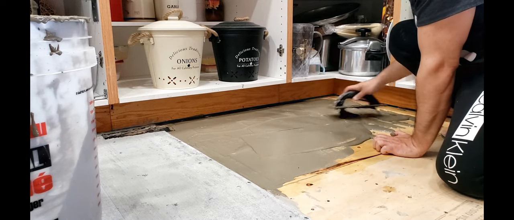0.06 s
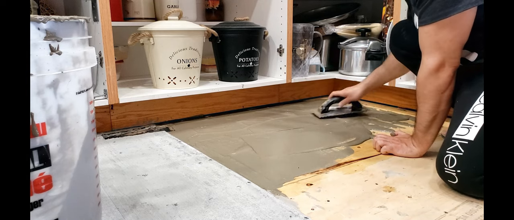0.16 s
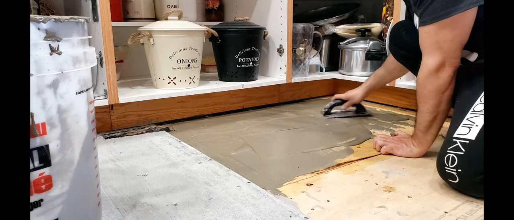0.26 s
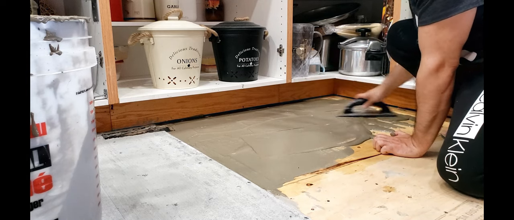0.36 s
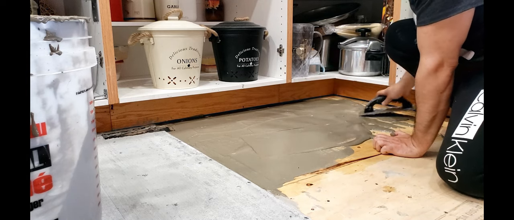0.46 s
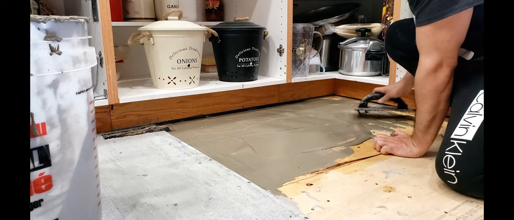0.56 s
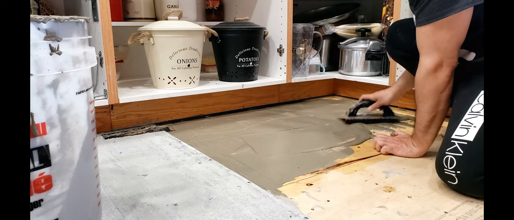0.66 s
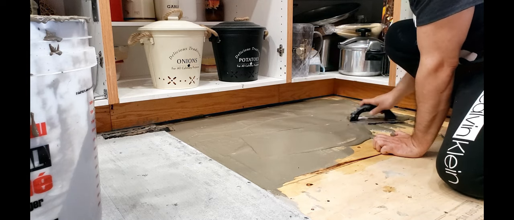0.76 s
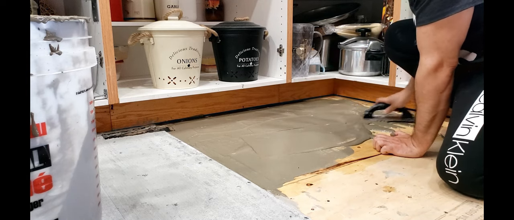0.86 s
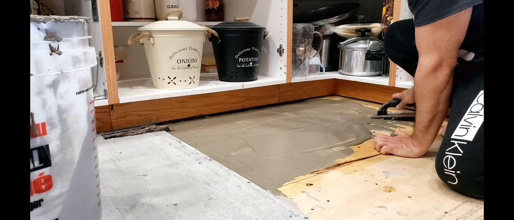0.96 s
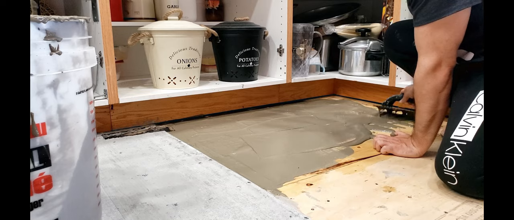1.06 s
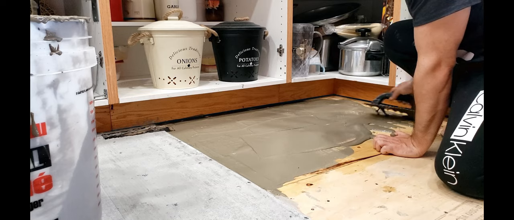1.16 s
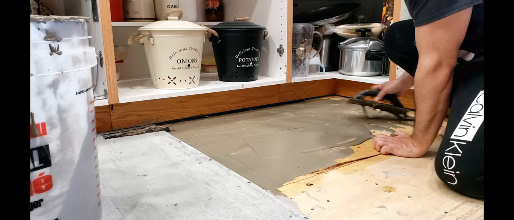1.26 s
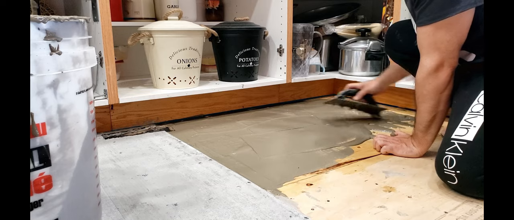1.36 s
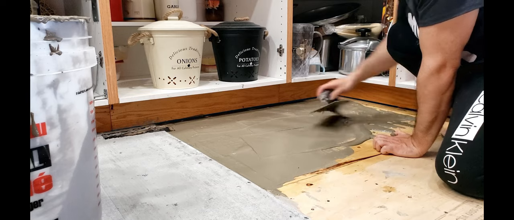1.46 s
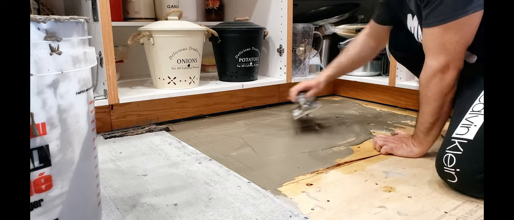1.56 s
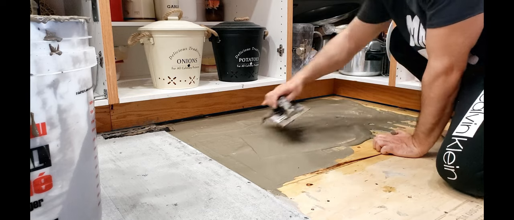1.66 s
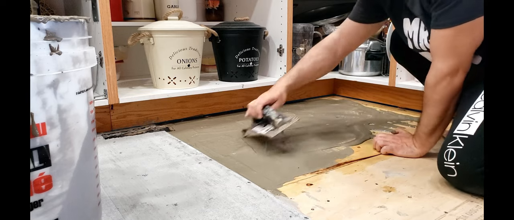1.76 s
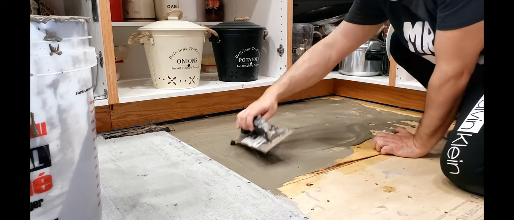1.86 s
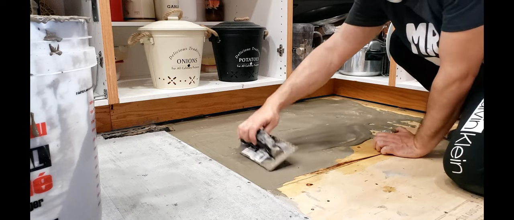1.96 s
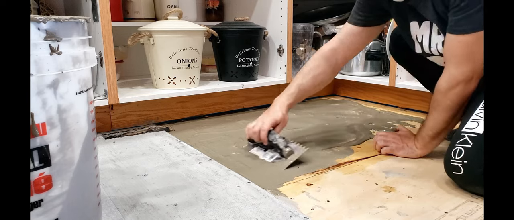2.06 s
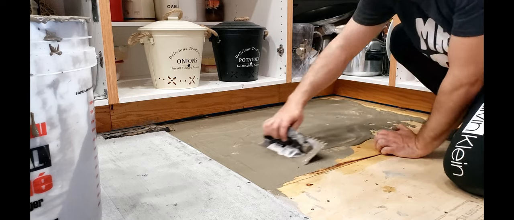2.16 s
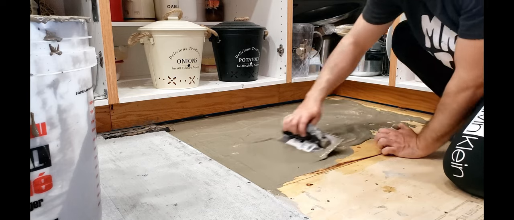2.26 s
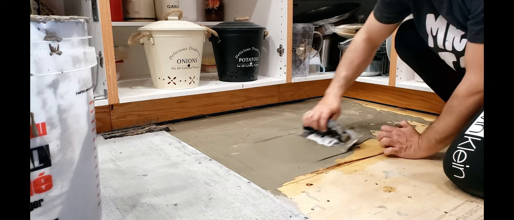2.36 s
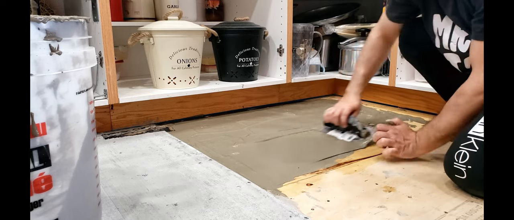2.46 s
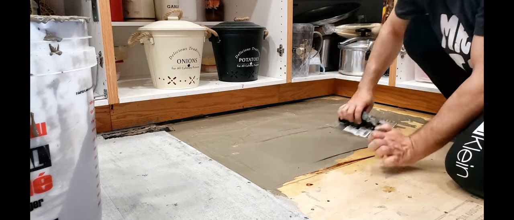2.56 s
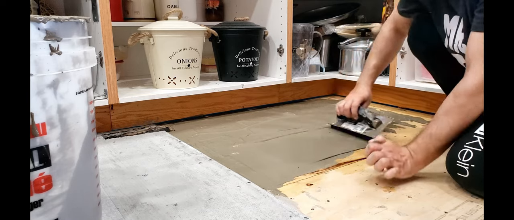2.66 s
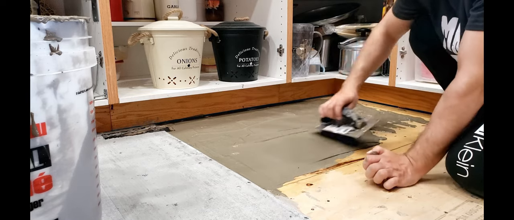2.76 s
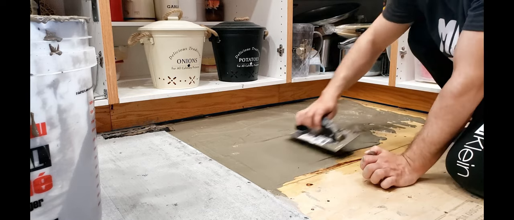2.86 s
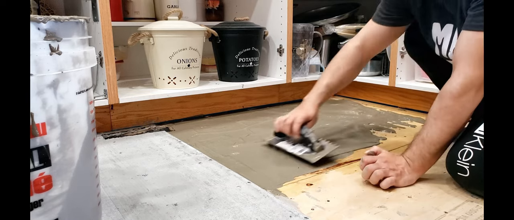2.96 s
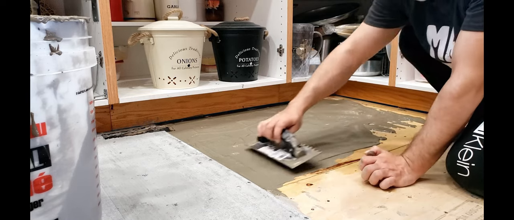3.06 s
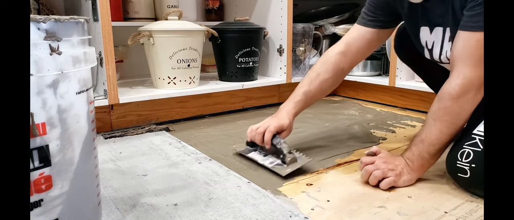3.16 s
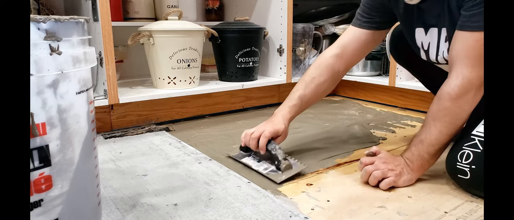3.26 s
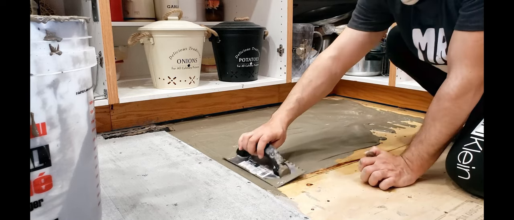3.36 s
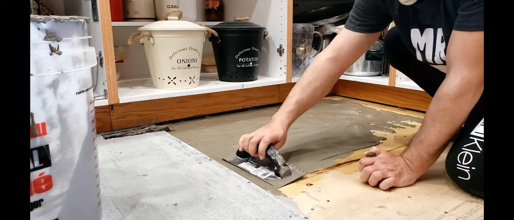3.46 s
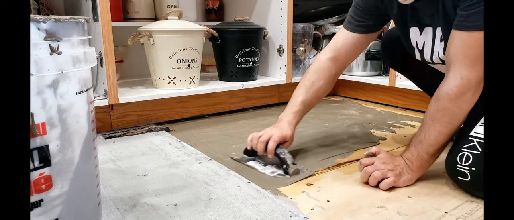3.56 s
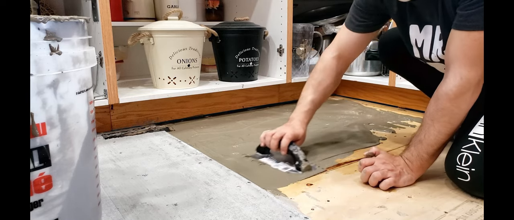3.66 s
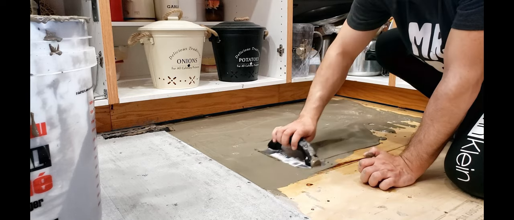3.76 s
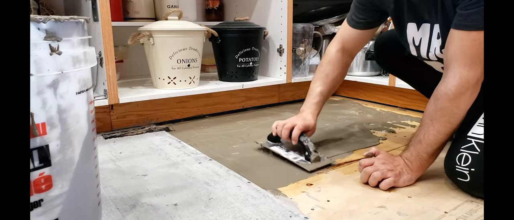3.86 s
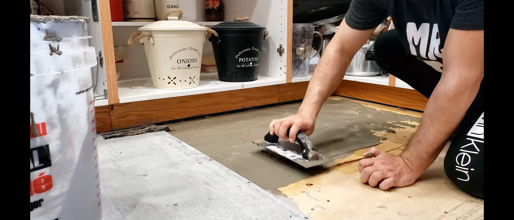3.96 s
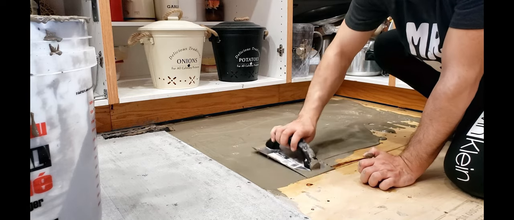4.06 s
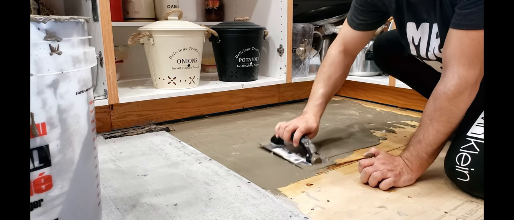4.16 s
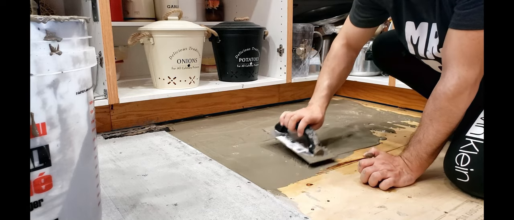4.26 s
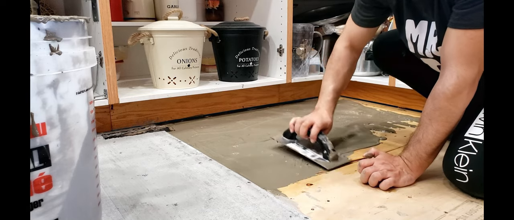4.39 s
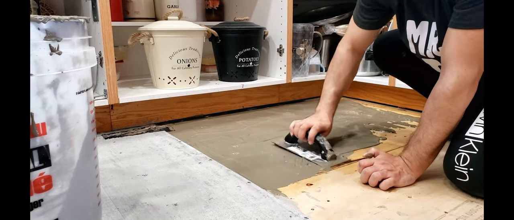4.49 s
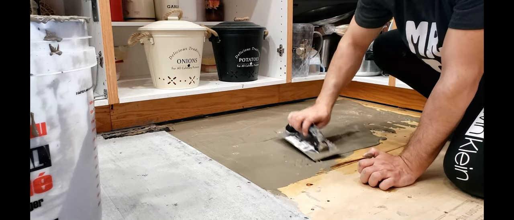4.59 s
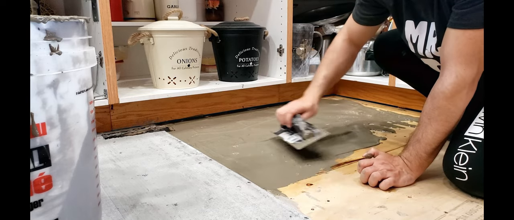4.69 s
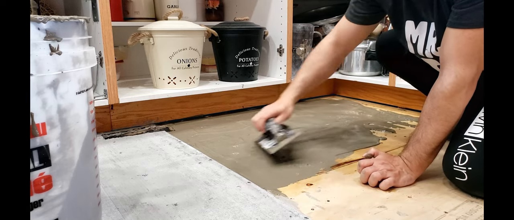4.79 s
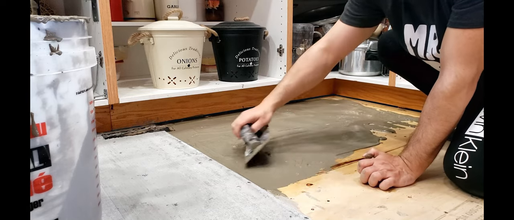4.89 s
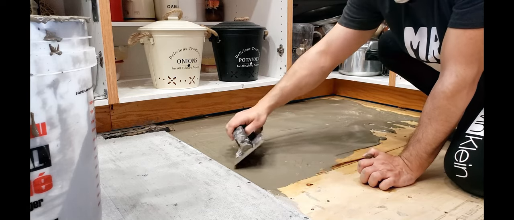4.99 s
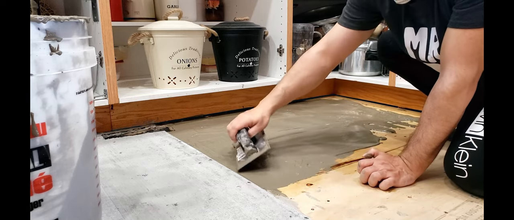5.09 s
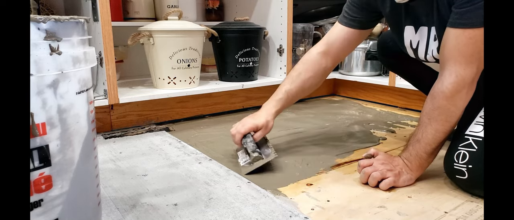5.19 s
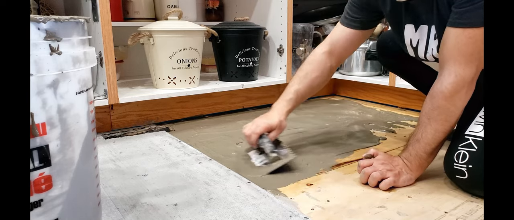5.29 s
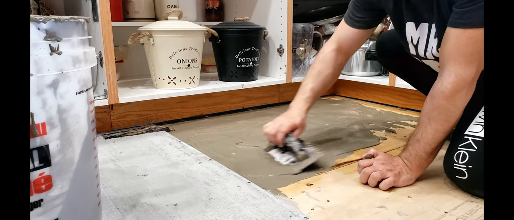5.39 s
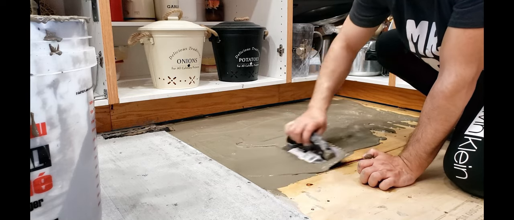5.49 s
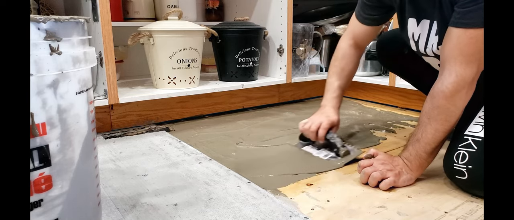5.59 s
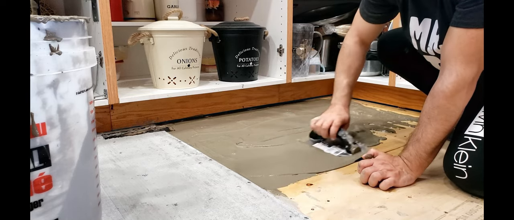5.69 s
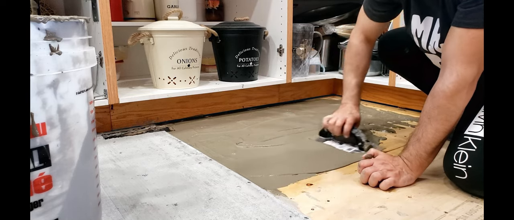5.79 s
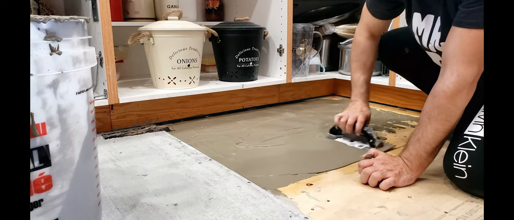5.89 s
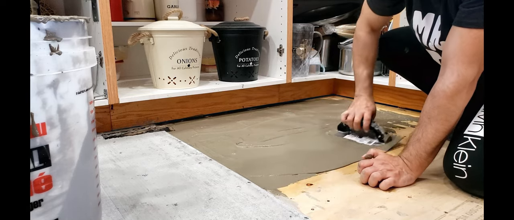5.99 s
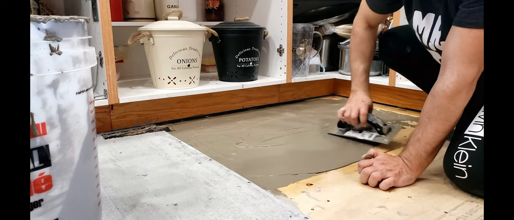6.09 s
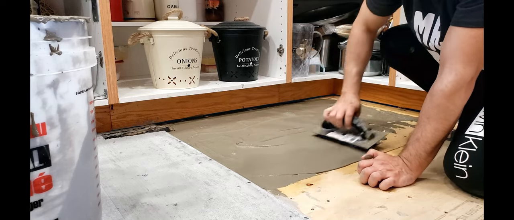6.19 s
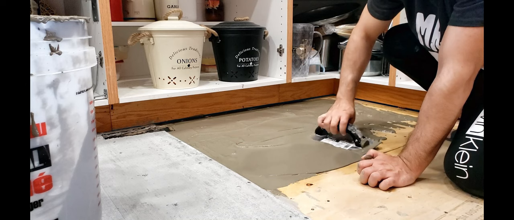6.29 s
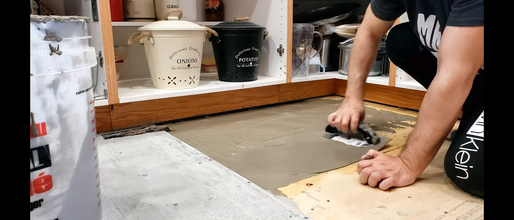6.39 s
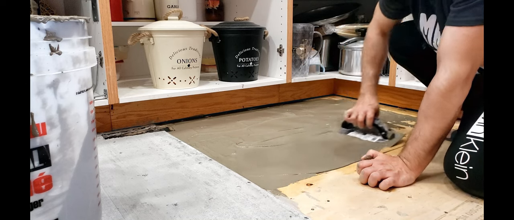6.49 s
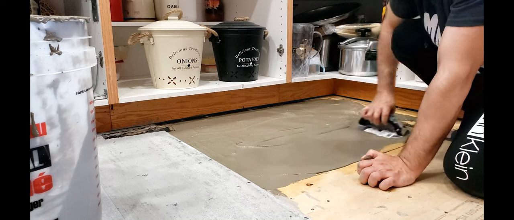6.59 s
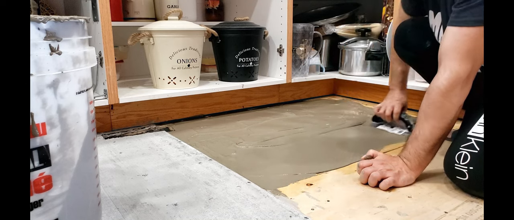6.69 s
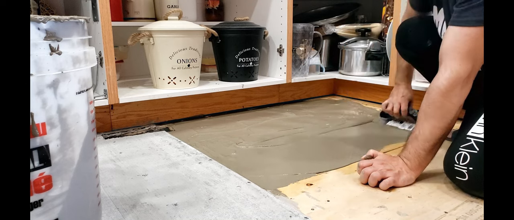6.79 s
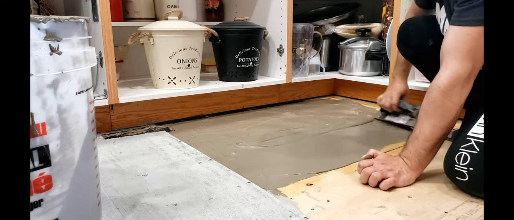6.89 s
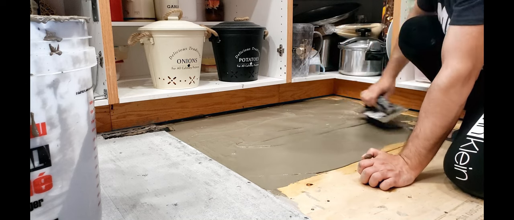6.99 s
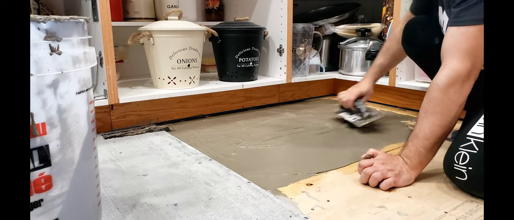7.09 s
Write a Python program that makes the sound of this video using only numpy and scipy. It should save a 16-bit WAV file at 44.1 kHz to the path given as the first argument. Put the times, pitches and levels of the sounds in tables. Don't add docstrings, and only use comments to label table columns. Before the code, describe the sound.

A steel trowel lands on a wooden floor and scrapes gritty mortar in short, hissing strokes, with knocks and ticks over a quiet fridge hum.

```python
import sys
import numpy as np
from scipy import signal
from scipy.fft import rfft, irfft, next_fast_len
from scipy.io import wavfile
from scipy.ndimage import uniform_filter1d

SR = 44100
rng = np.random.default_rng(int(sys.argv[2]) if len(sys.argv) > 2 else 0)


def volts_from_decibels(level):
    exponent = np.asarray(level, float) / 20
    return 10 ** exponent


def digitize_waveform(pressure):
    field = np.atleast_2d(pressure).T
    bounded = np.clip(field, -1, 1)
    quanta = np.round(bounded * 32767).astype(np.int16)
    wavfile.write(sys.argv[1], SR, quanta)


N = 315046

# start in seconds, steel tick level in dB,
# then thud, board knock and grit crack, each in dB relative to the tick.
LANDINGS = [(0.3752, -48.5, 2, 0, 1.5), (0.4188, -50, -19, -4, -24), (0.5241, -52, -20, 12, 13),
            (0.9105, -39, 2, 9.5, -8), (1.072, -51, -17, 7.5, -9), (2.1216, -49, 5.5, 3, 0),
            (2.1582, -35, 7, -1.5, -5), (2.3325, -36, -16, -13, -5.5), (3.2498, -66, 24.5, -8, -22),
            (3.2805, -66.5, 23, -7, -27), (3.543, -46.5, -14, -6, 1), (4.2254, -31.5, 6.5, -12, -2),
            (4.6, -30, 4, -8.5, -9.5), (5.001, -43.5, 10, 0.5, -10.5), (5.024, -42, 5.5, -3.5, -13),
            (5.133, -51.5, 23.5, 0, -12), (5.142, -36, -3, 1.5, -18), (5.325, -45.5, 5.5, -5, -2),
            (6.4367, -43, 7, 2, -11), (6.4503, -31.5, -5.5, -14, -16.5)]
# start in seconds, steel tick level in dB, crack in dB relative to the tick.
CATCHES = [
    (2.4639, -29.5, -5),
    (4.3797, -34, 4.5),
    (5.4898, -28, -38),
    (5.6242, -30.5, -6),
    (6.0676, -45.5, 17),
    (6.1543, -34.5, 1),
    (6.3098, -47.5, -3.5),
    (6.7498, -26.5, -4),
]
# start in seconds,
# grit level in dB, then blade, boards and joists, each in dB relative to the grit.
SQUASHES = [(.38, -64, -1, 0, 0), (.896, -55.5, -12, 1, 0), (.915, -61, -5, 23, 19),
            (1.051, -44.5, -17, 1, -7), (2.16, -51, 9, 14.5, 17.5), (4.229, -50.5, 8, 11, 22.5),
            (4.603, -44.5, 11, -3, 13.5), (5.004, -56.5, 3, 7.5, 23.5), (5.113, -55.5, -15, -15, 7),
            (5.141, -55, 9.5, 14.5, 18), (5.326, -58, -8, -10, 17), (6.44, -58.5, 6, 15, 14)]
# start in seconds, length in seconds, grit hiss level in dB,
# blade ring in dB relative to the grit, weight on the boards in dB relative to the grit.
DRAGS = [(0.535, .1, -39.5, 1, 3), (1.063, 0.083, -38.5, -5.5, 3.5), (2.154, 0.13, -46, 1, 1.5),
         (2.33, 0.13, -44.5, 1.5, 2.5), (2.394, 0.17, -39, 0, 2), (2.552, .16, -38.5, 0, 6.5),
         (3.534, 0.11, -57.5, -4, -8), (3.667, 0.19, -41.5, -9, -6.5), (3.885, 0.079, -34.5, -22, -13),
         (4.252, 0.12, -37, -2.5, -6.5), (4.62, 0.058, -37.5, -5, -5.5), (4.693, 0.037, -33.5, -10.5, -14),
         (5.368, 0.2, -42, 2.5, 2), (5.589, 0.24, -40.5, -1.5, 1.5), (5.797, 0.33, -40, -9.5, -3.5),
         (6.1, 0.1, -49, 10, 5), (6.233, 0.16, -62.5, -10, -1), (6.518, 0.19, -35.5, -0.5, -1),
         (6.635, 0.073, -42, 8.5, 2), (6.752, .21, -35, -5, 4)]
# time in seconds, favoured board pitch in Hz.
BOARD_PITCH = [(.55, 540), (.67, 195), (1.1, 376), (2.2, 230), (2.34, 735), (2.6, 306), (3.67, 196),
               (3.8, 540), (4.25, 220), (4.36, 460), (4.65, 223), (5.5, 200), (5.63, 520), (5.76, 287),
               (6.61, 303), (6.66, 776), (6.81, 740), (6.88, 233)]
# time in seconds, favoured blade pitch in Hz.
BLADE_PITCH = [
    (.6, 1390),
    (2.5, 1580),
    (4.31, 1340),
    (4.72, 2230),
    (5.15, 1410),
    (5.4, 1970),
    (5.5, 1470),
    (5.95, 2220),
    (6.15, 1570),
    (6.7, 1450),
]
# frequency in Hz, level in dB per Hz.
GRIT_COLOUR = [(1530, -5.5), (2600, -1), (3330, -5), (3820, 1.5), (6130, 4), (7020, 3), (8280, -6),
               (9200, -6), (12200, -2.5), (15100, -3), (15700, -7)]
# frequency in Hz, level in dB, time to fade by 60 dB in seconds.
BLADE_MODES = [(1057, 4, 0.15), (1366, -4.5, 0.069), (1500, 22, 0.031), (1520, 17.5, 0.034),
               (1646, 2, 0.26), (1910, 6, 0.42), (2003, 17.5, 0.0079), (2170, 6, 0.27), (2330, 3, 0.034),
               (2340, -67.5, 0.14), (2450, -3, 0.017)]
# frequency in Hz, level in dB, time to fade by 60 dB in seconds.
BOARD_MODES = [(188.7, 6, 0.2), (229.7, -1, .08), (302, 5, 0.12), (335, 3, 0.033), (359, 1.5, 0.11),
               (432, -2, 0.075), (484, -8, 0.14), (561, -3, 0.04), (619.8, -5.5, 0.23), (750, -4, .14),
               (813.7, -13.5, 0.14)]
# frequency in Hz, level in dB, time to fade by 60 dB in seconds.
JOIST_MODES = [(74.8, 4.5, 0.23), (93.5, -3, 0.48), (113, -14, 1), (141.4, -1, 0.36)]
# frequency in Hz, level in dB, time to fade by 60 dB in seconds.
THUMP_MODES = [(54.4, 6.5, 0.3), (77, 7.5, 0.13), (110, 4.5, 0.097), (147, -1, 0.087), (183, 0, 0.067),
               (234, -24.5, 0.0077)]
# multiple of the hum pitch, level in dB relative to the first tone.
HUM_OVERTONES = [(2, -13.5), (6, -24.5)]
# frequency in Hz, level in dB.
WHINES = [
    (6102, -83.5),
    (6280, -84),
]
# frequency in Hz, level in dB per Hz.
FAN_COLOUR = [(360, -41), (620, -13), (802, -15.5), (881, -5.5), (1080, -11.5), (1120, -13), (1550, -18.5),
              (1880, -3.5), (2090, -1.5), (2860, -27), (5770, -23), (6260, -14), (7560, -31), (10000, -31),
              (15700, -24.5)]
# frequency in Hz, width in Hz, level in dB.
FAN_HOLLOWS = [(6700, 300, -0.5)]
# frequency in Hz, level in dB per Hz.
RUMBLE_COLOUR = [(20, -21), (38, 5), (52, 4.5), (75, 4.5), (95, 3.5), (125, 2.5), (220, -9), (360, -13),
                 (500, -9), (620, -24.5), (1200, -110)]
# frequency in Hz, time to fade by 60 dB in seconds.
ROOM_FADE = [(60, 0.13), (500, 0.38), (3000, 0.4), (15000, 0.076)]
# frequency in Hz, side level minus middle level in dB.
STEREO_WIDTH = [(60, -14), (110, -19), (200, -14), (380, -10), (700, -4.5), (1290, -0.5), (2380, -2.5),
                (4400, 1.5), (8120, 0), (15000, -1.5)]
# frequency in Hz, left level minus right level in dB.
STEREO_LEAN = [(60, 0.5), (110, 0.0), (200, 1.5), (380, 1.5), (700, 2.0), (1290, 3.0), (2380, 2.0),
               (4400, 1.0), (8120, 0.0), (15000, -4.5)]

SIZE = next_fast_len(N + SR)
HZ = np.arange(SIZE // 2 + 1) * SR / SIZE
T = np.arange(N) / SR
SLOW = T[::32]
FAN_DB, RUMBLE_DB = -66, -61
HUM_HZ, HUM_WANDER_HZ, HUM_DB = 59.94, 0.404, -54
CATCH_THUD_DB, CATCH_KNOCK_DB = -19, -16
SQUASH_SWELL_S, SQUASH_DB_S = 0.012, 193
RISE_DB_S, ARCH_DB, FALL_DB_S = 300, 6, 246
SLUMP_DB, SLUMP_DB_S = -42.5, 119
BLADE_GROWTH_DB, BOARD_GROWTH_DB, JOIST_GROWTH_DB = 5, 5.5, 10.5
JOIST_DB, JOIST_PER_WEIGHT = -15, 0.97
BITE_LEAD_S, BITE_S = 0.017, 0.025
PLACES = 8


def unit(x):
    return x / np.sqrt(np.mean(x ** 2))


def on_hz(table):
    hz, value = np.transpose(table)
    return np.interp(np.log(HZ + 1), np.log(hz), value)


def between(low_hz, high_hz, steepness):
    return 1 / (1 + (low_hz / (HZ + 1)) ** 4) / (1 + (HZ / high_hz) ** steepness)


def colour(x, gain):
    return irfft(rfft(x, SIZE) * gain, SIZE)[..., :N]


def walk(rate):
    hold = int(SR / rate)
    levels = np.repeat(rng.standard_normal(N // hold + 1), hold)
    return uniform_filter1d(levels, hold)[:N]


def ring(x, modes, wander_db, focus_hz=None, octaves=0.73, reach_db=13.0):
    db = np.array([mode_db + wander_db * walk(9.0) for _, mode_db, _ in modes])
    if focus_hz is not None:
        db = db + [reach_db * np.exp(-(np.log2(hz / focus_hz) / octaves) ** 2) for hz, _, _ in modes]
    drive = x * volts_from_decibels(db) / np.sqrt(np.sum(volts_from_decibels(db) ** 2, axis=0))
    out = 0
    for k, (hz, _, t60) in enumerate(modes):
        decay = 1000.0 ** (-1 / (t60 * SR))
        w = 2 * np.pi * hz / SR
        push = [np.sin(w) * np.sqrt(4 * (1 - decay))]
        tone = signal.lfilter(push, [1, -2 * decay * np.cos(w), decay * decay], drive[k])
        out = out + (-1) ** k * tone
    return out


def ports(mid, side):
    side = side * volts_from_decibels(on_hz(STEREO_WIDTH))
    lean = volts_from_decibels(on_hz(STEREO_LEAN) / 2)
    return irfft(np.array([(mid + side) * lean, (mid - side) / lean]), SIZE)[:, :N]


def air(shape_db, db, flicker_db):
    noise = rng.standard_normal((2, N)) * volts_from_decibels(flicker_db * walk(4.19))
    mid, side = rfft(noise, SIZE) * volts_from_decibels(shape_db)
    return volts_from_decibels(db) * unit(ports(mid, side))


def fridge():
    turn = 2 * np.pi * np.cumsum(HUM_HZ + HUM_WANDER_HZ * walk(1.463)) / SR
    overtones = sum(volts_from_decibels(db + 2.9 * walk(3.6)) * np.sin(round(k) * turn) for k, db in HUM_OVERTONES)
    hum = np.sqrt(2) * volts_from_decibels(HUM_DB + 1.6 * walk(28.0)) * (np.sin(turn) + overtones)
    whine = sum(volts_from_decibels(db + 2.2 * walk(15.0)) * np.sin(2 * np.pi * hz * T) for hz, db in WHINES)
    hollows = sum(db / (1 + (2 * (HZ - hz) / width) ** 2) for hz, width, db in FAN_HOLLOWS)
    fan = air(on_hz(FAN_COLOUR) + hollows, FAN_DB, flicker_db=2.8)
    rumble = air(on_hz(RUMBLE_COLOUR), RUMBLE_DB, flicker_db=0.0)
    return hum + whine + fan + rumble


def landings():
    tick, thud, knock, crack = np.zeros((4, N + SR))
    t = T[:SR // 10]
    catches = [(s, db, CATCH_THUD_DB, CATCH_KNOCK_DB, crack_db) for s, db, crack_db in CATCHES]
    hits = LANDINGS + catches
    noises = rng.standard_normal((len(hits), len(t)))
    for (s, db, thud_db, knock_db, crack_db), noise in zip(hits, noises):
        i = int(s * SR)
        thud[i] += volts_from_decibels(db + thud_db)
        tick[i:i + len(t)] += volts_from_decibels(db) * noise * np.exp(-t / 0.023)
        knock[i:i + len(t)] += volts_from_decibels(db + knock_db) * noise * np.exp(-t / 0.0066)
        crack[i:i + len(t)] += volts_from_decibels(db + crack_db) * noise * np.exp(-t / 0.015)
    steel = volts_from_decibels(2.0) * colour(tick[:N], between(900, 2300, 6))
    floor = volts_from_decibels(27.5) * ring(thud[:N], THUMP_MODES, wander_db=3.5)
    board = volts_from_decibels(2.0) * ring(knock[:N], BOARD_MODES, wander_db=4.0)
    grit = volts_from_decibels(-3.5) * colour(crack[:N], volts_from_decibels(on_hz(GRIT_COLOUR)))
    return floor + board + steel + grit


def squash(s, db, *rel_db):
    t = np.maximum(SLOW - s, 0)
    grit = volts_from_decibels(db - SQUASH_DB_S * t) * (1 - np.exp(-t / SQUASH_SWELL_S))
    return grit * volts_from_decibels(np.array([0, *rel_db]))[:, None]


def drag(start, length, db, blade_db, weight_db):
    along = np.clip((SLOW - start) / length, 0, 1)
    before = np.maximum(start - SLOW, 0)
    after = np.maximum(SLOW - start - length, 0)
    fall = volts_from_decibels(-FALL_DB_S * after) + volts_from_decibels(SLUMP_DB - SLUMP_DB_S * after)
    down = max(s for s, *_ in LANDINGS if s < start + 0.01)
    bite = np.clip((SLOW - down + BITE_LEAD_S) / BITE_S, 0, 1) ** 2
    grit = volts_from_decibels(db - ARCH_DB * (2 * along - 1) ** 2 - RISE_DB_S * before) * fall * bite
    heap = along - 0.5
    blade = blade_db + BLADE_GROWTH_DB * heap
    board = weight_db + BOARD_GROWTH_DB * heap
    joist = JOIST_DB + JOIST_PER_WEIGHT * weight_db + JOIST_GROWTH_DB * heap
    return grit * volts_from_decibels(np.array([0 * along, blade, board, joist]))


def contact():
    moves = [drag(*row) for row in DRAGS] + [squash(*row) for row in SQUASHES]
    power = sum(gains ** 2 for gains in moves)
    return [np.interp(T, SLOW, np.sqrt(p)) for p in power]


def grains(share, spread_db, patchy_db, rate):
    hit = (rng.random(N) < share) * rng.standard_normal(N)
    size = np.minimum(rng.exponential(size=N), 4)
    return unit(hit * volts_from_decibels(spread_db * size + patchy_db * walk(rate)))


def scrape():
    hiss, steel, wood, beam = contact()
    blade_hz = np.interp(T, *np.transpose(BLADE_PITCH))
    board_hz = np.interp(T, *np.transpose(BOARD_PITCH))
    fine = grains(0.4, spread_db=1.1, patchy_db=1.94, rate=82.0)
    fine = fine + volts_from_decibels(-20.5) * grains(0.002, spread_db=5.5, patchy_db=-4.0, rate=18.0)
    coarse = grains(0.15, spread_db=0.67, patchy_db=0.5, rate=45.0)
    grit = volts_from_decibels(-2.5) * unit(colour(fine, volts_from_decibels(on_hz(GRIT_COLOUR)))) * hiss

    on_steel = unit(fine + 1.76 * coarse) * steel
    blade = volts_from_decibels(-6.5) * ring(on_steel, BLADE_MODES, 8.9, blade_hz, octaves=0.15, reach_db=6)
    blade = blade + volts_from_decibels(6.5) * colour(on_steel, between(1000, 2800, 4))

    on_wood = coarse * wood
    board = volts_from_decibels(-1.0) * ring(on_wood, BOARD_MODES, 4.0, board_hz, octaves=0.39, reach_db=13)
    board = board + volts_from_decibels(7.5) * colour(on_wood, between(160, 850, 6))
    joists = volts_from_decibels(-0.5) * ring(coarse * beam, JOIST_MODES, wander_db=5.0)
    return grit + blade + board + joists


def room(x, wet_db, near_db):
    t = T[:SR // 2]
    hz = np.arange(SR // 4 + 1) * 2.0 + 1
    noise = rfft(rng.standard_normal((PLACES, 2, len(t))))
    fade_hz, fade_s = np.transpose(ROOM_FADE)
    tail = 0
    for low in 45 * 2.0 ** np.arange(9):
        band = irfft(noise * ((hz >= low) & (hz < 2 * low)), len(t))
        t60 = np.interp(np.log(low), np.log(fade_hz), fade_s)
        tail = tail + band * 1000.0 ** (-t / t60) * np.sqrt(2 * np.log(1000) / t60 / SR)
    near = rng.standard_normal(tail.shape) * np.exp(-t / 0.0028)
    near = near / np.sqrt(np.sum(near ** 2, axis=-1, keepdims=True))
    paths = near * volts_from_decibels([[near_db], [1.5]]) + volts_from_decibels(wet_db) * tail
    place = np.array([walk(30.0) for _ in range(PLACES)])
    place = place / np.sqrt(np.sum(place ** 2, axis=0))
    echoes = sum(rfft(x * share, SIZE) * rfft(path, SIZE) for share, path in zip(place, paths))
    mid = echoes[0] / (1 + (250 / (HZ + 1)) ** 2) + rfft(x, SIZE)
    return mid, echoes[1]


def scene():
    trowel = landings() + scrape()
    mid, side = room(trowel, wet_db=-6.5, near_db=-6.5)
    return ports(mid, side) + fridge()


def low_pass(x):
    return signal.sosfilt(signal.butter(12, 16860, fs=SR, output="sos"), x)


def record(dry):
    bass_cut = 1 / np.sqrt(1 + (42 / (HZ + 1)) ** 8)
    mix = colour(dry, (HZ < 15800) * bass_cut)
    return low_pass(mix)


dry = scene()
out = record(dry)
digitize_waveform(out)
```